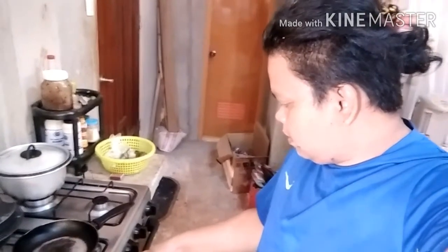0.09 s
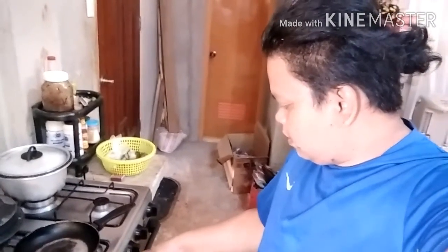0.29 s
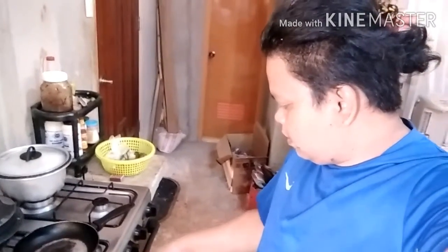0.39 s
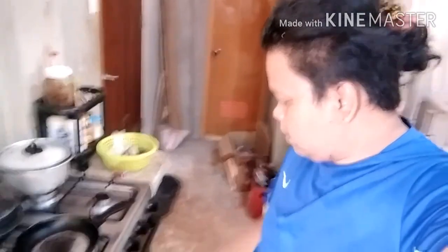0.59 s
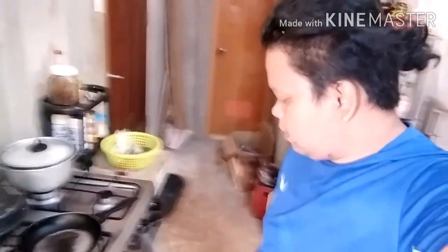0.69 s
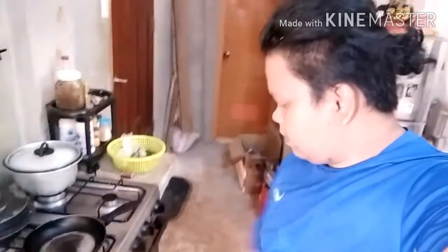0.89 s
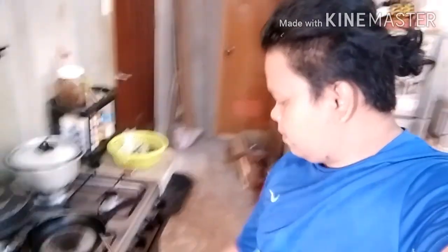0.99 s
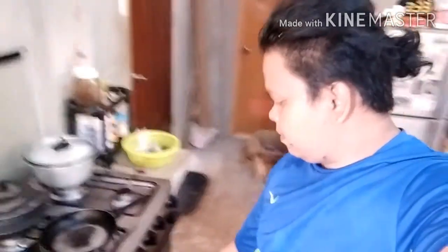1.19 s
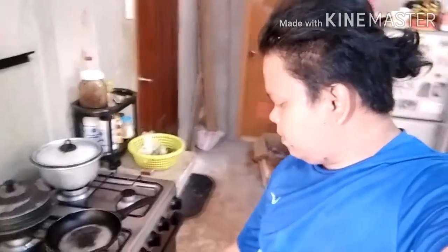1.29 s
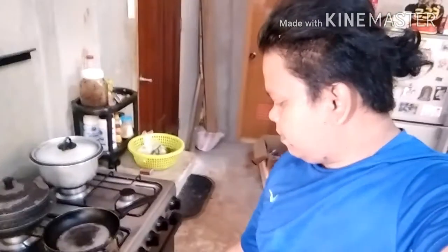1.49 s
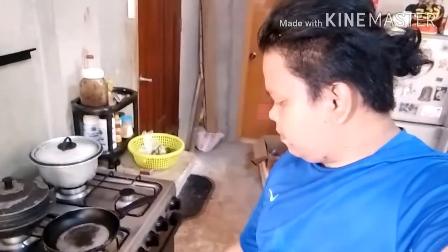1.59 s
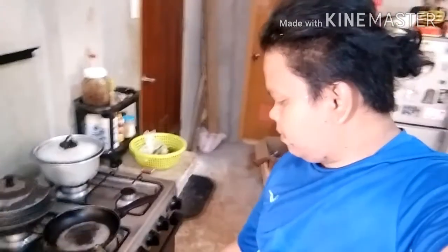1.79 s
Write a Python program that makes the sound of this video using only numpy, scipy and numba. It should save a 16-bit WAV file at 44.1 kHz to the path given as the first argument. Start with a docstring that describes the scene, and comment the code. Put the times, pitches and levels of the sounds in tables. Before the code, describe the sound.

A hand-held piezo lighter snaps twice, very close and slightly clipped, with small trigger ticks between; stove metal clatters, then fainter taps follow in a hard, echoing kitchen, caught by a phone with a pumping noise gate.

```python
"""A hard-walled kitchen, with a piezo lighter snapped at the stove close to a phone.
Each snap is a short noise rattle on ringing lighter parts; it clips the phone and rings in the room.
The trigger ticks back, metal stove parts are knocked, and later taps come from further off.
Filtered noise makes a wavering hum, under a thin sine that comes and goes.
The phone's noise gate shuts whenever the room tail sinks to the kitchen's hum."""
import sys
import numpy as np
from scipy import signal
from scipy.fft import rfft, irfft
from scipy.io import wavfile
from scipy.ndimage import uniform_filter1d
from numba import njit

SR = 44100
rng = np.random.default_rng(int(sys.argv[2]) if len(sys.argv) > 2 else 0)


def nominal_scale(level):
    """Amplitude ratio for a level in decibels (scalar or array-like)."""
    x = np.asarray(level, float) / 20
    return 10 ** x


def to_wav(sig):
    """Store sig (one row per channel, or 1-D mono) as 16-bit WAV at the path in sys.argv[1].

    Samples outside -1..1 are clipped; the rate is SR.
    """
    pcm = np.clip(np.atleast_2d(sig), -1, 1) * 32767
    pcm = np.round(pcm).astype(np.int16)
    wavfile.write(sys.argv[1], SR, pcm.T)  # frames by channels


N = 79380
LEAD_S = 0.3  # sound made ahead of the start, so that earlier tails carry over
M = N + int(LEAD_S * SR)

# Spring hammer snaps, close to the phone. Each row: start in [s], level in [dB], thump in [dB].
SNAPS = [(-.145, 0.5, -50.5), (0.2115, 1.5, -19), (0.535, 1, -19)]
# Resonances of hammer and lighter body. Each row: frequency in [Hz], level in [dB], T60 in [s].
SNAP_MODES = [(1700, -8, .02), (1955, 0, .03), (2234, -5, .03), (2400, -8, .02), (3180, -3, .015),
              (5030, -10, .015)]
# Low thump under a snap. Each row: frequency in [Hz], level in [dB], T60 in [s].
THUMP_MODES = [(85, -3, 0.068), (201.7, -4, 0.014), (456, -3.5, 0.01)]
# Broad colour of a snap. Each row: frequency in [Hz], relative gain in [dB].
SNAP_BODY = [(200, -25), (560, -19.5), (750, -19.5), (1300, -16), (1720, -3), (2140, 0.5), (2650, -8.5),
             (3100, -4.5), (4000, -10), (5200, -10), (7000, -18), (8800, -14), (11000, -16.5),
             (16000, -31.5)]
SNAP_RATTLE_S, SNAP_RING_DB, SNAP_ROOM_DB = 0.0055, -8, -9

# Trigger springing back. Each row: start in [s], level in [dB], tilt in [dB per octave] about 2 kHz.
TICKS = [(.029, -23, -2), (.392, -20, -2), (.480, -29, -5.5), (0.701, -19.5, -2)]
# Resonances of the trigger. Each row: frequency in [Hz], level in [dB], T60 in [s].
TICK_MODES = [(2000, -2, .012), (2600, 0, .012), (4500, -3, .01)]
# Broad colour of a tick. Each row: frequency in [Hz], relative gain in [dB].
TICK_BODY = [(500, -26.5), (1200, -9.5), (2300, 2.5), (3500, -2.5), (4800, -2.5), (6500, -14), (10000, -13),
             (16000, -30.5)]
TICK_RATTLE_S, TICK_RING_DB, TICK_ROOM_DB = 0.006, -2.5, -15.5

# Knocks on the stove's metal. Each row: start in [s], level in [dB], bass tilt and treble tilt
# in [dB per octave] below and above 2 kHz, rattle in [s], ring in [dB], room in [dB].
KNOCKS = [(0.3532, -10, -1.47, -1, 0.0092, -1, -7), (0.7506, 0.5, 3.5, 3.5, 0.0096, -2.5, -12.5),
          (.7948, -5, -1.8, 0.5, 0.0043, -16, -9.5), (0.809, -14.5, -1.2, 0.5, .005, -5, -11.5)]
# Resonances of the stove. Each row: frequency in [Hz], level in [dB], T60 in [s].
STOVE_MODES = [(565, -3, .09), (780, -8, .07), (1300, -8, .06), (1375, -8, .06), (1565, -6, .07),
               (1885, -9, .05), (2120, -8, .05), (2225, -9, .05), (2790, -1, .05), (3150, -11, .05),
               (4350, -13, .04), (8775, -20, .05)]
# Broad colour of the stove. Each row: frequency in [Hz], relative gain in [dB].
STOVE_BODY = [(88, -41), (150, -13), (286, -7), (368, -16), (578, -2.5), (702, 0), (1240, -7.5),
              (1530, -1.5), (2400, -3), (3160, -6.5), (5680, -21.5), (8560, -24.5), (16000, -43.5)]

# Taps further off in the kitchen. Each row: start in [s], level in [dB], bass tilt and treble tilt
# in [dB per octave] below and above 2 kHz, rattle in [s], ring in [dB], room in [dB].
TAPS = [(1.290, -41, 9, 0, .004, -12, -3), (1.3255, -31, -8.5, 1, 0.0051, -6.5, 0.5),
        (1.437, -36, -13, 1, .004, 1, 1), (1.5738, -16.5, 1, 0, 0.0039, -15.5, -4)]
# Resonances of what is tapped. Each row: frequency in [Hz], level in [dB], T60 in [s].
TAP_MODES = [(290, -6, .08), (650, 0, .1), (1950, -2, .02), (2490, -3, .02), (5450, -14, .06),
             (6000, -12, .03)]
# Broad colour of the taps. Each row: frequency in [Hz], relative gain in [dB].
TAP_BODY = [(120, -31), (200, -21), (448, -19), (529, -25), (851, -3), (1180, -9), (1320, -2), (2130, -2),
            (3020, -11), (6640, -42.5), (16000, -48.5)]

# Decay of the kitchen's reverberation. Each row: frequency in [Hz], T60 in [s].
ROOM_T60 = [(100, 0.47), (500, 0.62), (1000, 0.49), (2000, 0.46), (4000, 0.49), (8000, 0.59), (14000, 0.17)]
# Colour of the reverberation. Each row: frequency in [Hz], relative gain in [dB].
ROOM_DB = [(100, -3), (500, -0.5), (2000, 2.5), (6000, -2.5), (14000, -6)]
# Early echoes from near walls. Each row: delay in [s], level in [dB].
ECHOES = [(.0175, -13), (.046, -20)]
ROOM_RISE_S = 0.0098

# Colour of the kitchen hum. Each row: frequency in [Hz], relative gain in [dB].
HUM = [(18, -38.5), (40, -17), (90, -0.5), (160, -0.5), (415, -9.5), (700, -10.5), (1780, -20), (4090, -26),
       (6000, -38), (15000, -43)]
HUM_DB, HUM_WALK_DB = -46, 3.5  # mean level, and dB per unit of the smoothed random walk
# Course of the thin tone. Each row: time in [s], level in [dB].
WHINE_DB = [(1.44, -65), (1.48, -46.5), (1.57, -49), (1.64, -54.5), (1.75, -49), (1.8, -50)]
WHINE_HZ = 1700

MIC_LOW_HZ, CLIP = 55, 1.0  # the phone's bass cut, and its full scale
GATE_DB, GATE_DEPTH_DB, GATE_KNEE_DB = -42.5, -16, 2
GATE_LISTEN_HZ, GATE_WINDOW_S, GATE_CLOSE_S = 300, 0.02, 0.007


def colour(x, points):
    """Causal minimum-phase filter with a gain given by (Hz, dB) points."""
    n = 4096
    hz, db = np.array(points, float).T
    f = np.maximum(np.arange(n // 2 + 1) * SR / n, 1)
    gain_db = np.interp(np.log(f), np.log(hz), db)
    cepstrum = irfft(np.log(nominal_scale(gain_db)), n)
    # folding the cepstrum forward in time makes the filter causal
    cepstrum[1:n // 2] *= 2
    cepstrum[n // 2 + 1:] = 0
    impulse = irfft(np.exp(rfft(cepstrum)), n)
    return signal.fftconvolve(x, impulse)[:len(x)]


def unit(x):
    """Scale to an energy of 1."""
    return x / np.linalg.norm(x)


def tilt(hz, tilts_db):
    """Gain in dB of a bass slope below 2 kHz and a treble slope above it."""
    return np.where(hz < 2000, tilts_db[0], tilts_db[1]) * np.log2(hz / 2000)


def ring_down(modes, tilts_db=(0, 0)):
    """Struck resonances: sines that start together and die exponentially."""
    t = np.arange(8192) / SR
    hz, db, t60 = np.array(modes, float).T[:, :, None]
    decay = np.exp(-np.log(1000) * t / t60)
    return (nominal_scale(db + tilt(hz, tilts_db)) * np.sin(2 * np.pi * hz * t) * decay).sum(0)


def hit(modes, body, rattle_s, ring_db, tilts_db, chance):
    """Body colour plus modes, shaken by a short noise rattle; the room hears it as one blow."""
    click = np.zeros(8192)
    click[0] = 1
    tilted_body = [(hz, db + tilt(hz, tilts_db)) for hz, db in body]
    ring = unit(ring_down(modes, tilts_db))
    blow = unit(colour(click, tilted_body)) + nominal_scale(ring_db) * ring
    t = np.arange(len(chance)) / SR
    rattle = chance * np.exp(-(t / rattle_s) ** 2)
    rattled = signal.fftconvolve(blow, rattle)[:len(click)]
    return 10 * unit(rattled), 10 * unit(blow)


def add(out, y, s, db):
    """Mix a sound in at time s."""
    i = int((s + LEAD_S) * SR)
    out[i:i + len(y)] += nominal_scale(db) * y[:len(out) - i]


def room():
    """Noise tail of energy 1 that dies band by band, with two early echoes on top."""
    t = np.arange(SR) / SR
    tail = np.zeros(SR)
    hzs, t60s = np.array(ROOM_T60).T
    for hz in 60 * 2 ** np.arange(0, 8.1, 0.5):  # half-octave bands
        sos = signal.butter(2, [hz / 1.19, hz * 1.19], "band", fs=SR, output="sos")
        t60 = np.interp(np.log(hz), np.log(hzs), t60s)
        band = signal.sosfilt(sos, rng.standard_normal(SR))
        tail += band * np.exp(-np.log(1000) * t / t60)
    rise = 1 - np.exp(-t / ROOM_RISE_S)
    response = unit(colour(tail * rise, ROOM_DB))
    for s, db in ECHOES:
        response[int(s * SR)] += nominal_scale(db)
    return response


def lighter_snaps(dry, wet):
    """The spring hammer strikes: a rattle nearly alike each time, over a low thump."""
    same = rng.standard_normal(900)
    thump = ring_down(THUMP_MODES)
    for s, db, thump_db in SNAPS:
        chance = same + 0.067 * rng.standard_normal(900)
        y, blow = hit(SNAP_MODES, SNAP_BODY, SNAP_RATTLE_S, SNAP_RING_DB, (0, 0), chance)
        add(dry, y + nominal_scale(thump_db) * thump, s, db)
        add(wet, blow, s, db + SNAP_ROOM_DB)


def kitchen_hum():
    """Bass-heavy filtered noise whose level wavers at random."""
    hum = colour(rng.standard_normal(M), HUM)
    steps = np.repeat(rng.standard_normal(M // 2000 + 1), 2000)
    walk = uniform_filter1d(steps, 2000)[:M]
    return hum / hum.std() * nominal_scale(HUM_DB + HUM_WALK_DB * walk)


def thin_tone():
    """A steady sine whose level comes and goes."""
    t = np.arange(M) / SR - LEAD_S
    level_db = np.interp(t, *np.array(WHINE_DB).T)
    return np.sin(2 * np.pi * WHINE_HZ * t) * nominal_scale(level_db)


def trigger_ticks(dry, wet):
    """The trigger springs back as the thumb lets go: a fresh noise rattle on small modes."""
    for s, db, tilt_db in TICKS:
        chance = rng.standard_normal(900)
        y, blow = hit(TICK_MODES, TICK_BODY, TICK_RATTLE_S, TICK_RING_DB, (tilt_db, tilt_db), chance)
        add(dry, y, s, db)
        add(wet, blow, s, db + TICK_ROOM_DB)


def lighter():
    """Snaps and ticks share one spot, so one room response serves both."""
    dry, wet = np.zeros(M), np.zeros(M)
    lighter_snaps(dry, wet)
    trigger_ticks(dry, wet)
    return dry + signal.fftconvolve(wet, room())[:M]


def stove(rows, modes, body):
    """Knocks or taps: a spiky rattle on ringing modes, each kind in the room from its own spot."""
    dry, wet = np.zeros(M), np.zeros(M)
    for s, db, bass_db, treble_db, rattle_s, ring_db, room_db in rows:
        noise = rng.standard_normal(900)
        spiky = noise * np.abs(noise)
        y, blow = hit(modes, body, rattle_s, ring_db, (bass_db, treble_db), spiky)
        add(dry, y, s, db)
        add(wet, blow, s, db + room_db)
    return dry + signal.fftconvolve(wet, room())[:M]


def scene():
    """Lighter, kitchen, stove and far taps at the phone, with the lead cut off."""
    mix = lighter() + kitchen_hum() + thin_tone()
    mix += stove(KNOCKS, STOVE_MODES, STOVE_BODY)
    mix += stove(TAPS, TAP_MODES, TAP_BODY)
    return mix[None, M - N:]


@njit
def follow(x, fall):
    """Jump up at once, sink slowly."""
    y, e = np.empty(len(x)), x[0]
    for i in range(len(x)):
        e = x[i] if x[i] > e else e + fall * (x[i] - e)
        y[i] = e
    return y


def noise_gate(x):
    """Gain in dB that ducks all that is under the threshold, judged without the bass."""
    listen = signal.butter(2, GATE_LISTEN_HZ, "high", fs=SR, output="sos")
    power = uniform_filter1d(signal.sosfilt(listen, x) ** 2, int(GATE_WINDOW_S * SR))
    over_db = 10 * np.log10(power + 1e-12) - GATE_DB
    gain_db = GATE_DEPTH_DB / (1 + np.exp(np.clip(over_db / (GATE_KNEE_DB / 4), -20, 20)))
    # the power window is centred; this delay leaves 130 samples of look-ahead
    late = int(GATE_WINDOW_S * SR / 2) - 130
    gain_db = np.r_[np.full(late, gain_db[0]), gain_db[:-late]]
    return follow(gain_db, 1 / (GATE_CLOSE_S * SR))


def band_limit(x):
    """A steep low-pass at the top of the band."""
    return signal.sosfilt(signal.butter(12, 16360, fs=SR, output="sos"), x)


def record(dry):
    """The phone's microphone cuts the bass, its gate ducks quiet stretches, and peaks clip."""
    bass_cut = signal.butter(4, MIC_LOW_HZ, "high", fs=SR, output="sos")
    heard = signal.sosfilt(bass_cut, dry)
    gated = heard * nominal_scale(noise_gate(heard[0]))
    clipped = np.clip(gated, -CLIP, CLIP)
    return band_limit(clipped)


dry = scene()
out = record(dry)
to_wav(out)
```